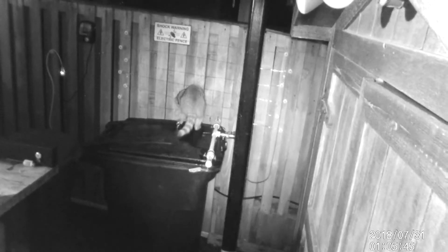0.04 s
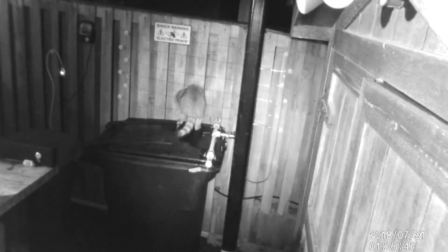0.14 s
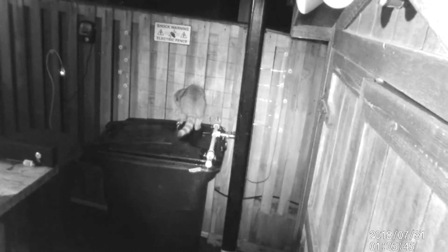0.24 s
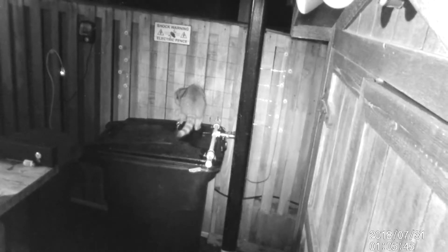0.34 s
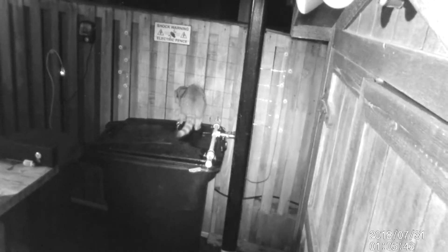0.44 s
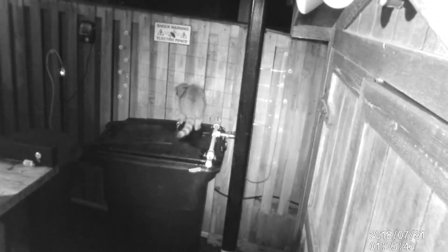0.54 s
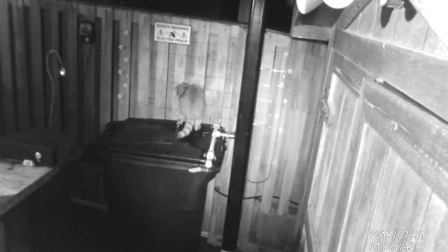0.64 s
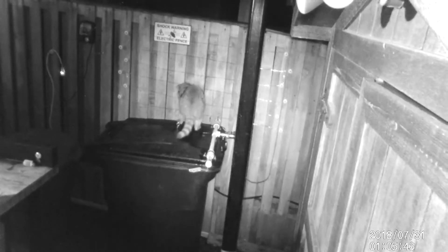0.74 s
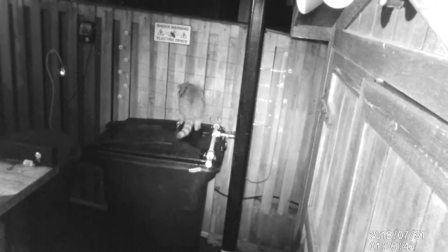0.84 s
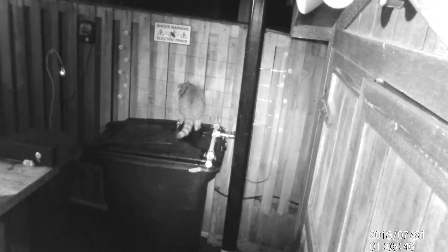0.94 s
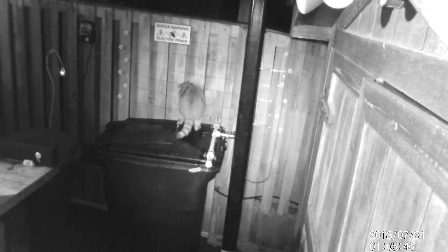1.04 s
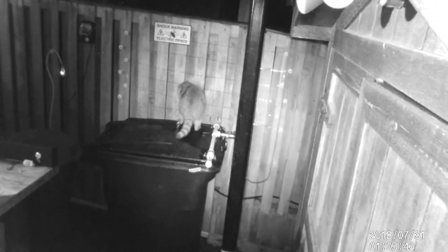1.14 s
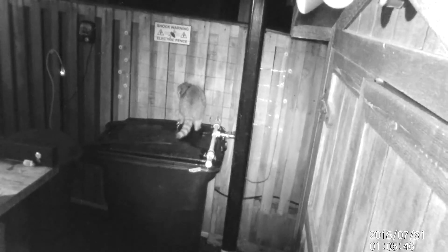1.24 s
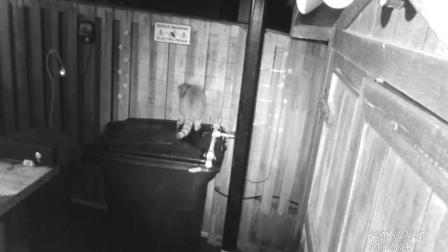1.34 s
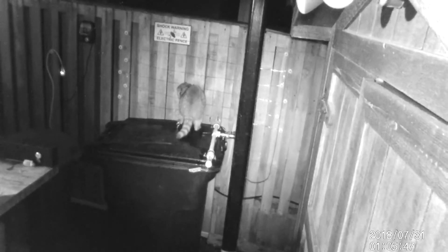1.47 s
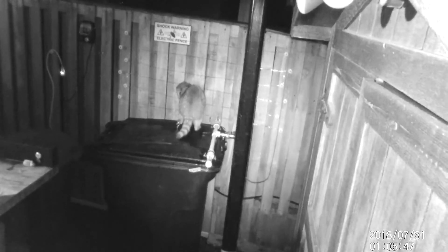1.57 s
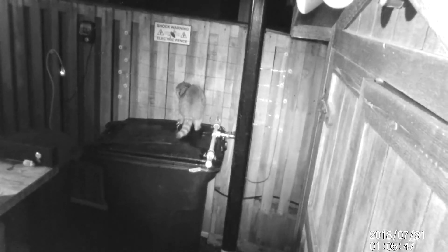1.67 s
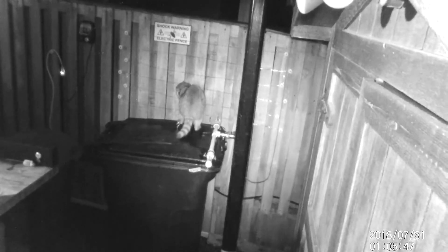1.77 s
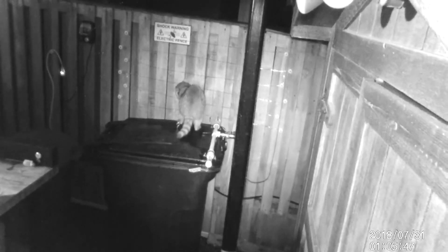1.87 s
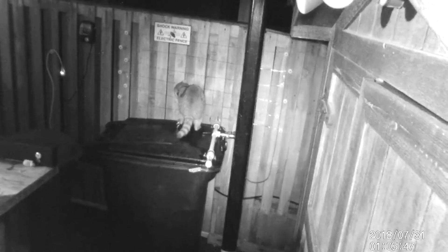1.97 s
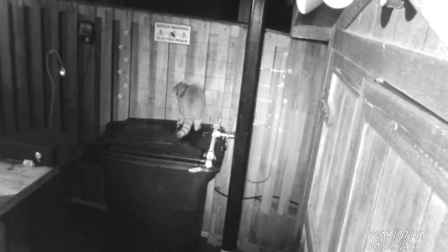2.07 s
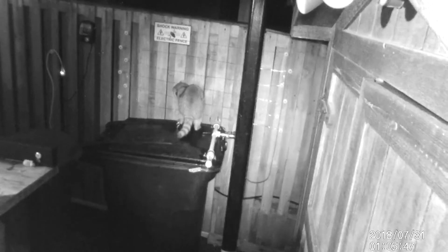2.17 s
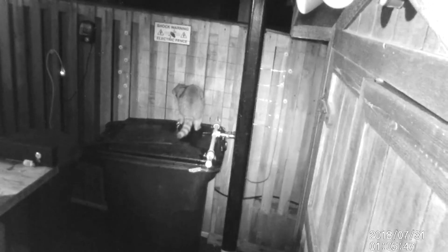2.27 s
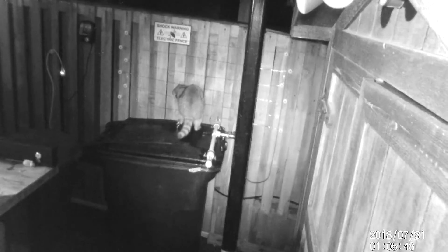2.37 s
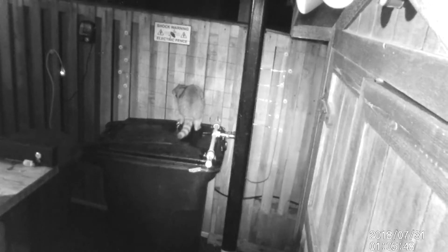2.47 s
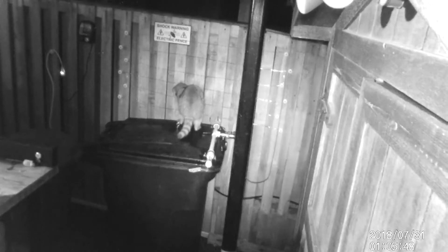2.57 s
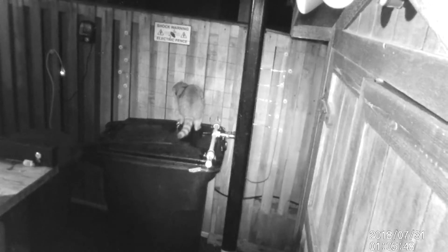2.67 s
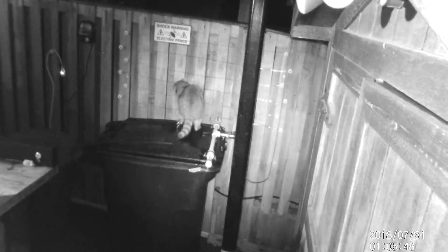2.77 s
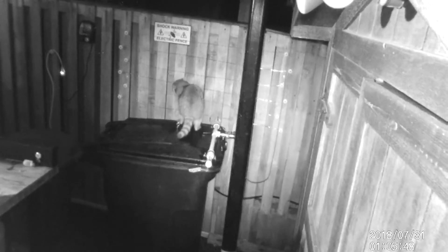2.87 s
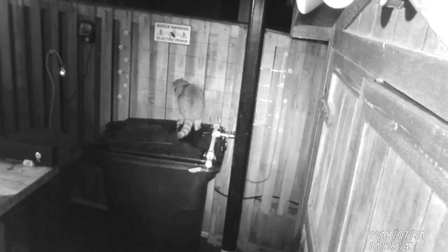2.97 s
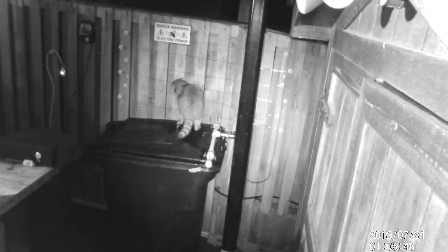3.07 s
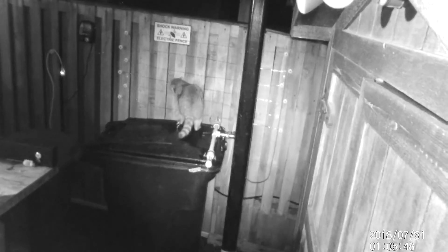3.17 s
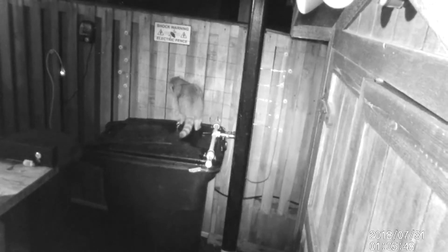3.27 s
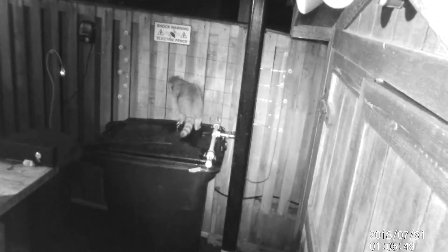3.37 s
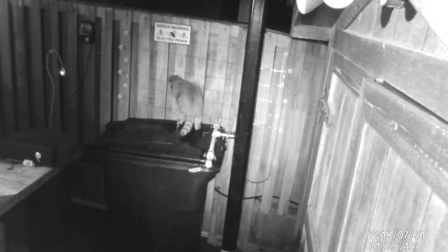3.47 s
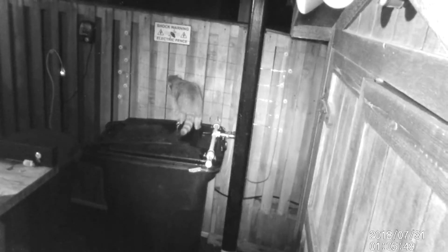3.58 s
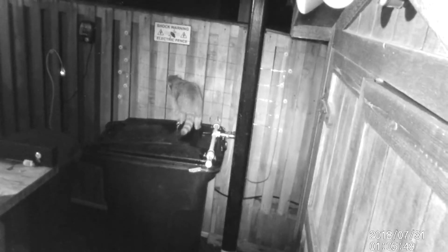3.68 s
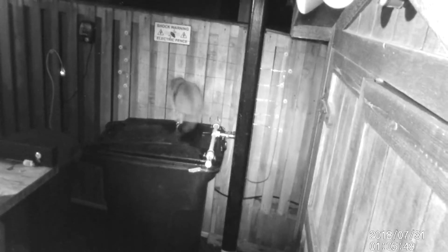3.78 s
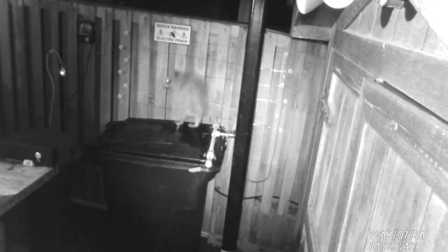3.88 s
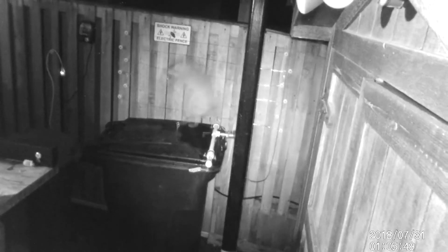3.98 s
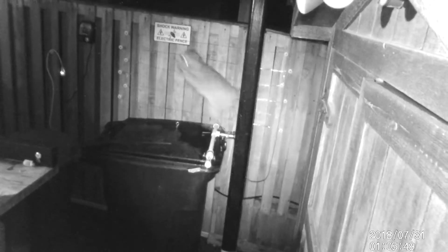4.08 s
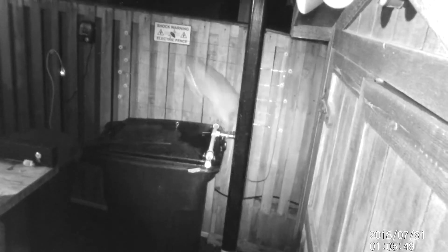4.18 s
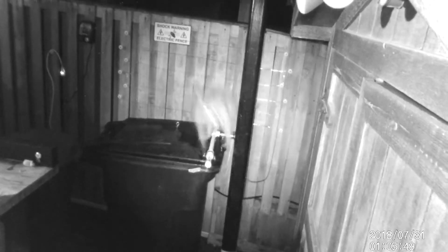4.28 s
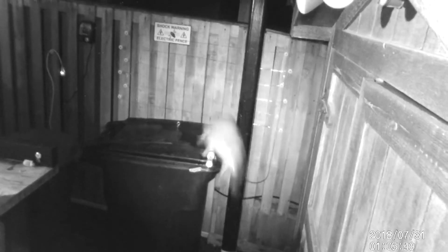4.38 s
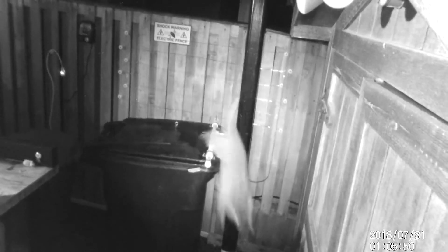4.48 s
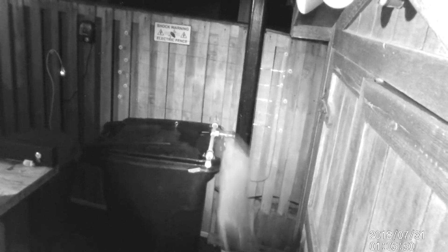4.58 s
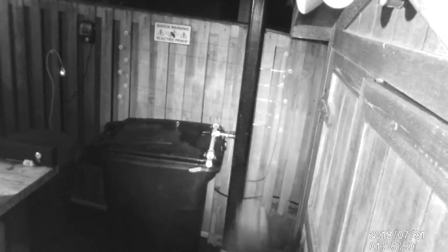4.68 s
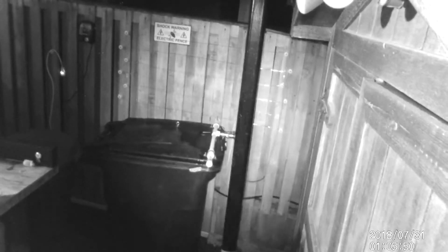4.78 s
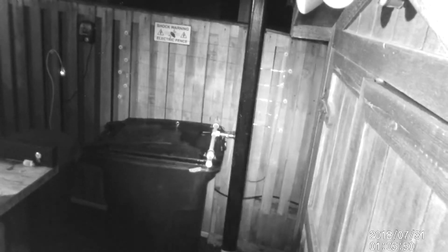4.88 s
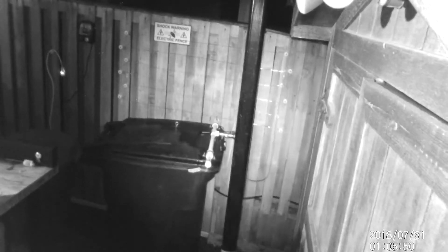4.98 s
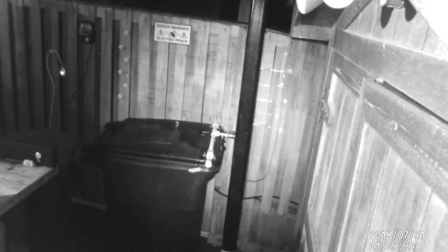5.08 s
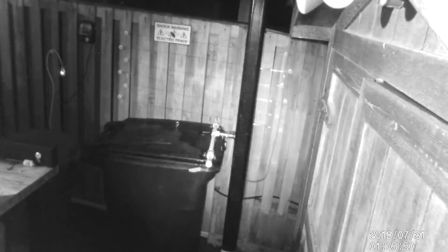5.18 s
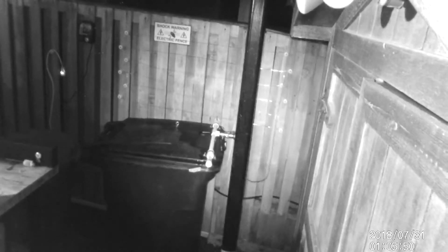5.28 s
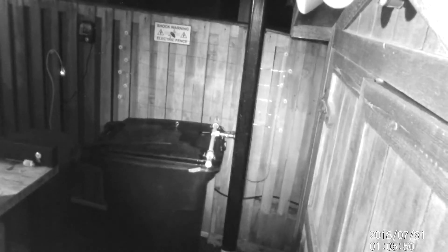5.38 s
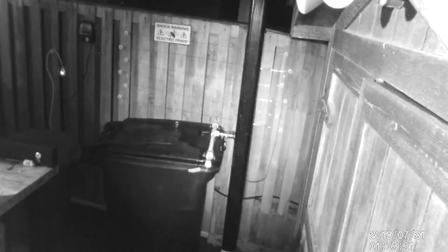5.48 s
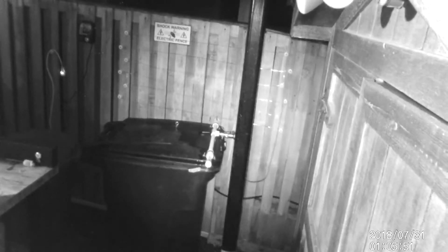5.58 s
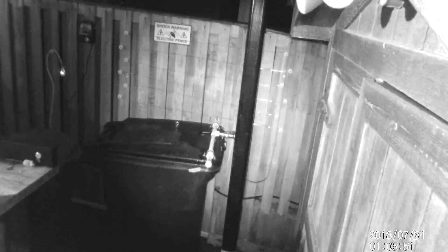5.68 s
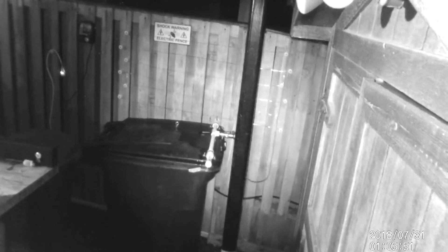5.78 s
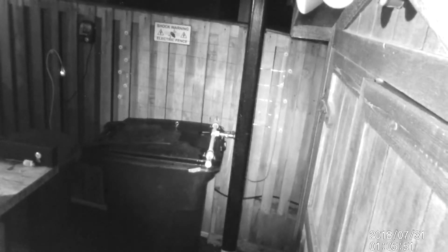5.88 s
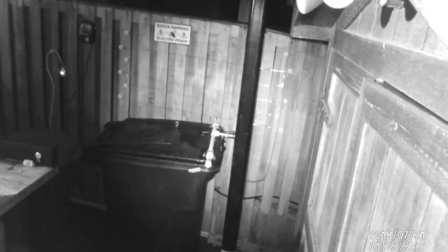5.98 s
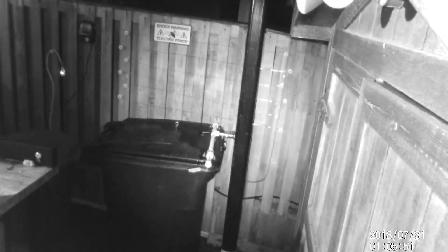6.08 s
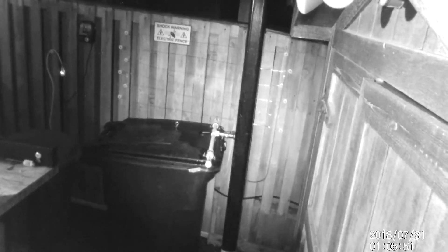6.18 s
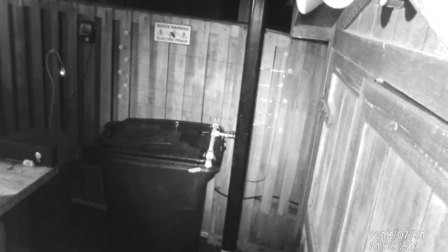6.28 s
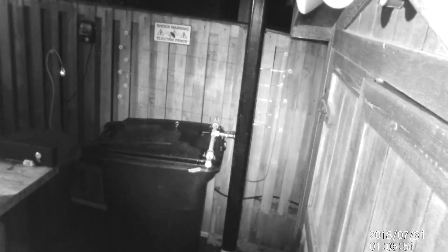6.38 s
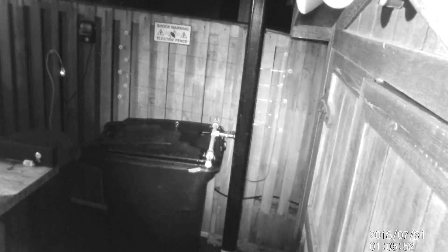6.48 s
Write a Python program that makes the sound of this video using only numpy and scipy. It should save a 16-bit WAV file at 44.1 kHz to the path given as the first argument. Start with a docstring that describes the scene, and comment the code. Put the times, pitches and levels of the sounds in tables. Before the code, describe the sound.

A quiet, hissy night yard erupts in hollow drumming and claw scrapes on a bin, a hard overloaded landing, fading rustles, then knocks and a clink.

```python
"""A raccoon bolts from the lid of a rubbish bin in a small fenced yard at night: claws scrabble and paws drum.
Random streams of contacts excite the hollow bin, whose walls and air are sums of decaying modes.
The animal lands with a crash and rustles away through litter; wooden knocks and a metal clink follow further off.
Fence echoes and a diffuse tail surround these sounds. Hiss, hum, drone and whine are filtered noise and sines.
A narrow-band microphone with a hard amplitude limit hears it all."""
import sys
import numpy as np
from scipy import signal
from scipy.fft import rfft, irfft
from scipy.io import wavfile

SR = 44100
rng = np.random.default_rng(int(sys.argv[2]) if len(sys.argv) > 2 else 0)


def dump_mix(stems):
    """Bounce the given channels to the path in sys.argv[1] as a 16-bit WAV at rate SR."""
    frames = np.atleast_2d(stems).T  # one column per channel
    limited = np.clip(frames, -1, 1)  # hard clip at full scale
    pcm = np.round(limited * 32767).astype(np.int16)
    wavfile.write(sys.argv[1], SR, pcm)


N = 287928
T = np.arange(N) / SR  # seconds
RING_T = T[:SR]  # the first second, for decays

# Levels in the tables are relative, ahead of later gains and filters; decay_s is the time to fall to 1/e.

# spectrum of the hiss: frequency_hz, level_db
HISS_COLOUR = [(20, 8.5), (70, 7), (150, 1), (300, -2.5), (600, -4.5), (1100, -8), (1600, -14.5),
               (2300, -13), (3200, -15.5), (4100, -18.5), (4800, -12.5), (5450, -3), (6000, -16.5),
               (7000, -21), (8000, -28), (9300, -8.5), (11000, -20)]
# slow swells of the hiss: centre_s, level_db, half_width_s (to 1/e), pitch_hz
HISS_SWELLS = [(.2, -58.5, 0.4, 3100), (1.467, -49.5, 0.1, 5620)]
# steady hum tones: frequency_hz, level_db
HUM_TONES = [(1012, -64), (1185, -66.5), (1841, -72.5), (2309, -66.5), (2611, -80.5)]
# bursts of a thin whine: start_s, end_s
WHINES = [(.06, 0.45), (2.46, 2.82)]
FLICKER_HZ, FLICKER_WIDTH_HZ, FLICKER_DB = 5520, 150, -49  # the top of the hiss flickers quickly
DRONE_HZ, DRONE_DB, DRONE_REST_DB = 213.3, -56, -68.5
DRONE_FADE_FROM_S, DRONE_FADE_S = 2.68, 0.069

# short ringing ticks of claw tips: start_s, level_db, decay_s, pitch_hz
TICKS = [(1.472, -47, .003, 5200), (1.985, -41.5, 0.012, 3620), (2.312, -46, .008, 3500),
         (2.98, -44, 0.011, 3900), (3.233, -37, 0.0077, 3500), (3.556, -39, 0.009, 4540),
         (4.7466, -9.5, 0.0027, 3940), (5.237, -30.5, 0.0059, 3560), (5.45, -31, 0.0056, 3330),
         (5.945, -38.5, 0.032, 3450), (6.273, -36, 0.018, 4200)]
# feet scuffing over a rough surface: start_s, level_db, decay_s
SCUFFS = [(3.075, -45.5, 0.053), (5.614, -29, 0.018), (6.07, -42, 0.017), (6.195, -44, .04),
          (6.252, -39, .012)]
# claws catching and skidding on the bin: start_s, level_db, decay_s
CLAWS = [(3.633, -37, 0.042), (3.711, -24, 0.018), (3.755, -19.5, 0.021), (3.813, -20, 0.03),
         (3.8305, -6.5, 0.011), (4.024, -22, .022), (4.145, -21, 0.0064), (4.152, -16.5, 0.0094),
         (4.187, -16.5, 0.012), (4.264, -17.5, 0.053), (4.447, -22, 0.0057), (4.682, -22, 0.015),
         (4.70, -23.5, 0.051), (4.764, -21.5, 0.018), (4.838, -24, 0.047), (4.891, -25, 0.0033)]
SCUFF_HZ, CLAW_HZ = 2420, 3360  # resonance centres

# shoves of the legs against the bin: start_s, hold_s, claw_scratch_db, paw_drum_db, bin_heave_db
SHOVES = [(3.614, 0.13, -47, -38, -47), (3.747, 0.084, -31, -22.5, -36.5), (3.828, 0.048, -23.5, -32, -39),
          (3.884, 0.027, -20.5, -13, -27), (3.989, 0.049, -29.5, -17.5, -42),
          (4.15, 0.089, -32.5, -21.5, -32.5), (4.259, 0.077, -23.5, -20, -38),
          (4.351, .13, -26, -17.5, -28)]
SHOVE_ATTACK_S, CLAW_RELEASE_S, PAW_RELEASE_S, HEAVE_RELEASE_S = 0.0043, 0.038, 0.054, 0.038
# spectrum of claws rasping: frequency_hz, level_db
SCRATCH_COLOUR = [(150, -33), (500, 6.5), (900, 3.5), (1400, 9), (2300, 7.5), (3300, 4), (4600, 4),
                  (7000, -8.5)]
# spectrum of paws drumming: frequency_hz, level_db
DRUM_COLOUR = [(60, -25), (150, -12.5), (230, 2), (450, 0.5), (800, -6), (1300, -13), (3000, -28.5)]
# spectrum of the whole bin heaving: frequency_hz, level_db
HEAVE_COLOUR = [(20, -4.5), (45, -10), (68, -4.5), (110, -5.5), (170, -7.5), (500, -41.5)]
# modes of the bin's walls and lid: frequency_hz, level_db, t60_s
BIN_MODES = [(63.9, 8, 1), (83.5, -14, 0.3), (115, -26, 0.26), (208, 6.5, 0.12), (227.5, -1, 0.35),
             (281, -1, 0.19), (326.1, -2, 0.28), (412, -9.5, 0.19), (509.1, 4, 0.21), (542, 1.5, 0.09),
             (626, -15, .25), (782, -3, .35), (865, -10, 0.6), (1250, -11.5, .35)]
PANEL_RING_DB = -19
# the bin rocks: start_s, level_db
ROCKS = [(3.885, 1), (4.355, 6)]
# modes of the bin's air and broad walls: frequency_hz, level_db, t60_s
BOOM_MODES = [(57.55, 5, 0.9), (67.6, -0.5, 3.3)]
# flaps of the hollow lid: start_s, level_db, decay_s, ring_db
LID = [(3.892, -37, 0.016, -17), (3.9905, -16, 0.0063, 1.5), (4.019, -14.5, 0.0061, 0),
       (4.266, -20, 0.0045, -10.5)]
# spectrum of the lid's contacts: frequency_hz, level_db
LID_COLOUR = [(150, -33), (400, -6), (600, 5), (850, 1), (1200, -16), (3000, -19.5)]
# modes of the lid: frequency_hz, level_db, t60_s
LID_MODES = [(221, -3, 0.82), (406, -6, 0.077), (556, -4, 0.34), (737, -4.5, 0.38), (858, 4, 0.28),
             (1206, -11, .35)]

# soft blows of paws and body that ring the bin: centre_s, level_db, pitch_hz (of the push)
THUDS = [(3.894, -20, 343), (3.922, -11, 290), (3.940, -15, 303), (4.2, -25, 332), (4.268, -13, 453),
         (4.37, -11, 251), (4.384, -9.5, 242), (4.409, -17, 300), (4.448, -9.5, 386), (4.483, -20, 300),
         (4.771, -9, 510)]
# close soft thumps of paws and body, with little ring; the row at 4.714 s is a quick echo of the thump before
# it: centre_s, level_db, pitch_hz (of the push)
CLOSE_THUMPS = [(4.7088, 1, 380), (4.714, -7, 638), (4.813, -3, 640), (4.955, -10.5, 1130),
                (5.131, -27, 705)]
THUD_RING_DB, CLOSE_THUMP_RING_DB = -12, -26
# the landing, a quick chain of hard blows: start_s, level_db, decay_s, ring_db
CRASH = [(4.7838, -5.5, 0.006, -1), (4.7882, -4, 0.0092, -15), (4.7945, -28, 0.019, -9),
         (4.803, -16.5, 0.016, -26)]
# spectrum of the landing's contacts: frequency_hz, level_db
CRASH_COLOUR = [(20, -34), (50, -5), (120, 2), (200, 8.5), (450, 7), (750, 4), (1100, -7.5), (2100, -1.5),
                (3200, -7), (4500, -7), (7000, -18.5)]
# modes of what it lands on: frequency_hz, level_db, t60_s
CRASH_MODES = [(181.5, 15.5, 0.16), (217, -1, 0.73), (357, -14, 0.18), (450, 7, 0.18), (568, 2, 1),
               (682, -14, .35), (650, 2, 0.66), (955, -33, 0.21), (1240, -18, 0.13), (1650, -22, 0.4),
               (1900, -15, 0.25), (2220, 11.5, 0.028), (2112, -20, 0.28), (2124, 3.5, 0.098),
               (2620, -17, 0.21), (2640, -21, .3), (3530, -14, 0.23)]

# bounds through the litter: start_s, level_db
BOUNDS = [(4.926, -33), (5.03, -40), (5.089, -42.5), (5.286, -38.5), (5.356, -42.5), (5.58, -53)]
# spectrum of the rustle: frequency_hz, level_db
RUSTLE_COLOUR = [(60, 12), (300, -1.5), (800, 0.5), (1400, -4.5), (2500, 1.5), (3500, 1.5), (5000, 5),
                 (7000, -4)]
BOUND_ATTACK_S, BOUND_HOLD_S, BOUND_RELEASE_S = 0.0077, 0.014, 0.017
STIR_FROM_S, STIR_DB = 4.2, -56.5  # faint stirring of the litter, onward to the end

# wooden knocks further off: start_s, level_db, decay_s, ring_db
KNOCKS = [(6.1173, -32, 0.017, -10), (6.133, -42, 0.014, -24), (6.1945, -31.5, .014, -6),
          (6.213, -41, 0.024, -12), (6.271, -34, 0.0044, 11), (6.3238, -31, 0.0098, -2),
          (6.362, -41, 0.0083, -24), (6.515, -38, 0.0099, 1)]
# spectrum of the knocks' contacts: frequency_hz, level_db
KNOCK_COLOUR = [(80, -14), (300, -0.5), (520, -2.5), (760, 5), (1200, -6), (1800, -6), (2800, -18),
                (6000, -28)]
# modes of the wood: frequency_hz, level_db, t60_s
KNOCK_MODES = [(280, -7.5, 0.36), (591, 10.5, 0.11), (682, 2, .2), (816, -16, .2), (1100, -28, .15)]
# a piece of metal is jostled: start_s, level_db, decay_s, ring_db
CLINK = [(6.4372, -29.5, 0.008, 1), (6.445, -31, 0.017, -22)]
# spectrum of the clink's contacts: frequency_hz, level_db
CLINK_COLOUR = [(200, -5), (1200, -8), (1900, -2), (3400, -4.5), (5000, 2.5), (7000, -5.5)]
# modes of the metal: frequency_hz, level_db, t60_s
CLINK_MODES = [(1770, -9, .3), (2100, 13, 0.28), (2733, 9, 0.34), (4050, -15, .3), (4350, -9, .25),
               (5000, -9, .3), (5150, -7, .25)]

# reflections from the nearest fences: delay_s, gain (linear, signed)
FENCE_ECHOES = [(.0052, 0.069), (.0068, -0.069), (0.0153, .24), (.021, 0.036)]
# response of the microphone: frequency_hz, level_db
MICROPHONE = [(20, -3), (4800, -0.5), (5300, -2.5), (5800, -5.5), (6300, -11.5), (6900, -28.5),
              (8000, -25.5), (9400, -22.5), (10800, -42), (13000, -30), (16000, -60)]
TOP_HZ = 15700  # final cut-off


def amp(db):
    """Amplitude ratio: 20 dB is a factor of ten."""
    return 10 ** (np.asarray(db) / 20)


def unit(x):
    """Normalisation to a root-mean-square value of 1."""
    return x / np.sqrt(np.mean(x ** 2))


def add(out, s, sound):
    """Superposition: a sound is summed in from time s."""
    i = int(s * SR)
    out[i:i + len(sound)] += sound[:N - i]


def convolve(x, response):
    """Linear system: the output is the input convolved with the impulse response."""
    return signal.fftconvolve(x, response)[:len(x)]


def response(points, size=8192):
    """Minimum phase: folding the cepstrum gives a causal impulse response with the given spectrum."""
    hz, db = np.transpose(points)
    bins = np.maximum(np.arange(size // 2 + 1) * SR / size, 1)
    level_db = np.interp(np.log(bins), np.log(hz), db)
    cepstrum = irfft(np.log(amp(level_db)))
    cepstrum[1:size // 2] *= 2
    cepstrum[size // 2 + 1:] = 0
    return irfft(np.exp(rfft(cepstrum)))


def colour(x, points):
    """Spectral shaping of white sound, scaled to keep its power as the microphone picks it up."""
    shape = response(points)
    heard_shape = convolve(shape, response(MICROPHONE))
    return convolve(x, shape) / np.linalg.norm(heard_shape)


def resonate(x, hz, width_hz):
    """Simple resonator: unit gain at the centre, falling on either side."""
    b, a = signal.iirpeak(min(hz, SR / 3), hz / width_hz, fs=SR)
    return signal.lfilter(b, a, x)


def ring(modes):
    """Modal superposition: exponentially decaying sines form an impulse response of energy 1."""
    out = np.zeros(len(RING_T))
    for k, (hz, db, t60) in enumerate(modes):
        decay = np.exp(-np.log(1000) * RING_T / t60)
        gain = (-1) ** k * amp(db) / np.sqrt(t60)  # signs alternate
        out += gain * np.sin(2 * np.pi * hz * RING_T) * decay
    return out / np.linalg.norm(out)


def contacts(per_s, spread_db):
    """Random impact process: tiny impulses of uneven size and random sign, rms 1."""
    size_db = spread_db * np.clip(rng.standard_normal(N), -2, 2)
    sizes = amp(size_db) * rng.choice([-1, 1], N)
    return unit(sizes * (rng.random(N) < per_s / SR))


def gesture(s, db, attack, hold, release):
    """Movement envelope: linear rise, hold and exponential decay."""
    rise = np.clip((T - s) / attack, 0, 1)
    fall = np.exp(-np.maximum(T - s - attack - hold, 0) / release)
    return amp(db) * rise * fall


def tone(hz, width_hz):
    """Filtered noise: two equal resonances in series make a wavering pitch, steadier when narrow."""
    once = resonate(rng.standard_normal(N), hz, width_hz)
    return unit(resonate(once, hz, width_hz))


def steady(hz, waver=0.26):
    """Sine plus narrow-band noise: the slow beating makes the tone waver, rms near 1."""
    return np.sqrt(2) * np.sin(2 * np.pi * hz * T) + waver * tone(hz, width_hz=11.3)


def background():
    """Noise and tones: hiss, faint hum, a steady drone that fades to a fainter level and a thin whine."""
    hiss = amp(-47.5) * colour(rng.standard_normal(N), HISS_COLOUR)
    # slow noise multiplies a sine, giving a narrow flickering band
    lowpass = signal.butter(N=2, Wn=FLICKER_WIDTH_HZ, fs=SR, output="sos")
    flicker = unit(signal.sosfilt(lowpass, rng.standard_normal(N)))
    hiss = hiss + amp(FLICKER_DB) * flicker * np.sin(2 * np.pi * FLICKER_HZ * T)
    for s, db, width_s, hz in HISS_SWELLS:
        swell = np.exp(-((T - s) / width_s) ** 2)
        hiss = hiss + amp(db) * swell * tone(hz, width_hz=830)
    hum = sum(amp(db) * steady(hz) for hz, db in HUM_TONES)
    fade_times = [DRONE_FADE_FROM_S, DRONE_FADE_FROM_S + DRONE_FADE_S]
    drone = amp(np.interp(T, fade_times, [DRONE_DB, DRONE_REST_DB])) * steady(DRONE_HZ)
    gate = sum(np.clip(np.minimum(T - start, end - T) / 0.052, 0, 1) for start, end in WHINES)
    whine = gate * (tone(hz=4396, width_hz=150) + amp(-3) * tone(hz=6630, width_hz=150))
    return hiss + hum + drone + amp(-56.5) * whine


def scrapes(rows, hz, width):
    """Friction as short fading runs of clicks through paired resonances; width is a share of the pitch."""
    envelope = np.zeros(N)
    for s, db, decay_s in rows:
        add(envelope, s, amp(db) * np.exp(-RING_T / decay_s))
    skids = envelope * contacts(per_s=16000, spread_db=2.5)
    resonant = resonate(resonate(skids, hz, width * hz), hz, width * hz)
    return 2 / np.sqrt(width) * resonant  # narrower bands pass less power


def scramble(uneven_db=2.0):
    """Stick-slip and forced vibration: claws rasp the lid, paws drum its panels and rock the hollow bin."""
    claws, paws, weight = np.zeros(N), np.zeros(N), np.zeros(N)
    for s, hold, claw_db, paw_db, heave_db in SHOVES:
        claws += gesture(s, claw_db, SHOVE_ATTACK_S, hold, CLAW_RELEASE_S)
        paws += gesture(s, paw_db, SHOVE_ATTACK_S, hold, PAW_RELEASE_S)
        weight += gesture(s, heave_db, SHOVE_ATTACK_S, hold, HEAVE_RELEASE_S)
    # the claws grip and slip, so the rasp comes in quick spurts
    grip = amp(uneven_db * tone(hz=33.9, width_hz=50))
    rasp = grip * contacts(per_s=2700, spread_db=3.0) * claws
    scratch = amp(-4.0) * colour(rasp, SCRATCH_COLOUR)
    drum = amp(-9) * colour(contacts(per_s=900, spread_db=1) * paws, DRUM_COLOUR)
    heave = colour(contacts(per_s=620, spread_db=2.5) * weight, HEAVE_COLOUR)
    panels = amp(PANEL_RING_DB) * convolve(drum, ring(BIN_MODES))
    return scratch + drum + heave + panels


def boom():
    """Free vibration of air and walls: the bin rocks at the leap, and again at the tumble over the edge."""
    out, body = np.zeros(N), ring(BOOM_MODES)
    for s, db in ROCKS:
        add(out, s, amp(db) * body)
    return out


def struck(blows, spectrum, modes):
    """Impact excitation: each hard blow is a fading run of contacts and an impulse to the object's modes."""
    envelope, kicks = np.zeros(N), np.zeros(N)
    for s, db, decay_s, ring_db in blows:
        onset = 1 - np.exp(-RING_T / 0.00057)
        fade = amp(db) * onset * np.exp(-RING_T / decay_s)
        add(envelope, s, fade)
        kicks[int(s * SR)] = amp(ring_db) * np.linalg.norm(fade)  # ring relative to the blow's energy
    clatter = colour(envelope * contacts(per_s=14000, spread_db=0), spectrum)
    return clatter + convolve(kicks, ring(modes))


def thuds(rows, ring_db, pad_hz=1300):
    """Soft impact: a padded blow pushes a surface in and lets it back; the bin's modes ring on."""
    direct = np.zeros(N)
    lead = .005  # seconds of push before the centre
    for s, db, hz in rows:
        angle = 2 * np.pi * hz * (RING_T - lead)
        push = angle * np.exp((1 - angle ** 2) / 2)  # Gaussian derivative, peak 1
        add(direct, s - lead, amp(db) * push)
    blows = direct + amp(ring_db) * convolve(direct, ring(BIN_MODES))
    # fur and pads cushion the highs
    cushion = signal.butter(N=2, Wn=pad_hz, fs=SR, output="sos")
    return signal.sosfiltfilt(cushion, blows)


def rustle():
    """Crackling as random contacts: litter snaps under each bound over a faint constant stirring."""
    feet = sum(gesture(s, db, BOUND_ATTACK_S, BOUND_HOLD_S, BOUND_RELEASE_S) for s, db in BOUNDS)
    stir = amp(STIR_DB) * (T > STIR_FROM_S)
    return colour(contacts(per_s=2000, spread_db=5.5) * (feet + stir), RUSTLE_COLOUR)


def yard(x, wet_db, t60=0.31):
    """Early reflection and reverberation: slaps from the nearest fences and a short diffuse tail."""
    decay = np.exp(-np.log(1000) * RING_T / t60)
    build_up = 1 - np.exp(-RING_T / 0.019)
    tail = rng.standard_normal(SR) * decay * build_up
    tone_balance = response([(100, 2.5), (400, -5.0), (1000, 0), (6000, -3.5)])
    tail = convolve(tail / np.linalg.norm(tail), tone_balance)
    echoes = amp(wet_db) * tail
    for delay, gain in FENCE_ECHOES:
        echoes[int(delay * SR)] += gain
    return x + convolve(x, echoes)


def scene():
    """Direct-to-reverberant ratio conveys distance: the bin is near; rustle, knocks and clink are further off."""
    ticks = sum(scrapes([(s, db, decay_s)], hz, width=0.85) for s, db, decay_s, hz in TICKS)
    scuffs = scrapes(SCUFFS, SCUFF_HZ, width=1.3)
    claws = scrapes(CLAWS, CLAW_HZ, width=1.6)
    lid = struck(LID, LID_COLOUR, LID_MODES)
    blows = thuds(THUDS, THUD_RING_DB) + thuds(CLOSE_THUMPS, CLOSE_THUMP_RING_DB)
    crash = struck(CRASH, CRASH_COLOUR, CRASH_MODES)
    near = ticks + scuffs + scramble() + claws + boom() + lid + blows + crash
    knocks = struck(KNOCKS, KNOCK_COLOUR, KNOCK_MODES)
    clink = struck(CLINK, CLINK_COLOUR, CLINK_MODES)
    far = amp(0.5) * rustle() + knocks + clink
    return (background() + yard(near, wet_db=-6.5) + yard(far, wet_db=-1))[None]


def record(dry):
    """Band limiting and overload: narrow-band microphone, hard clipping, dull output stage and cut-off."""
    heard = convolve(dry[0], response(MICROPHONE))
    clipped = np.clip(heard, -.7, .7)
    dulled = convolve(clipped, response([(6200, 0), (7200, -6)]))
    cut_off = signal.ellip(8, .2, 70, TOP_HZ, fs=SR, output="sos")
    return signal.sosfilt(cut_off, dulled)[None]


dry = scene()
out = record(dry)
dump_mix(out)
```